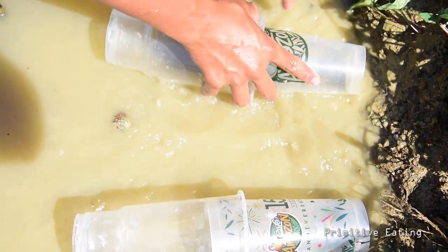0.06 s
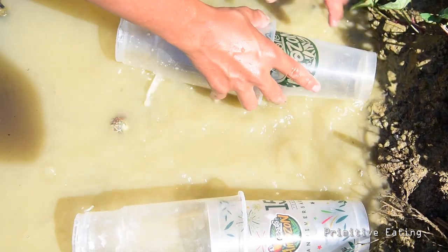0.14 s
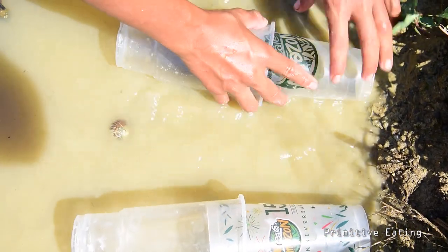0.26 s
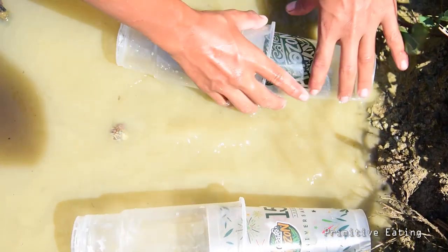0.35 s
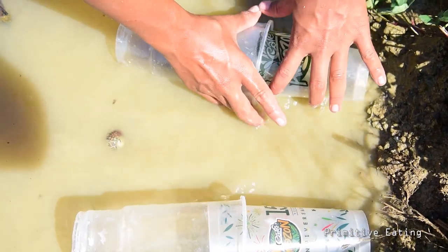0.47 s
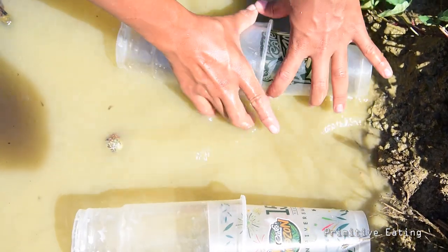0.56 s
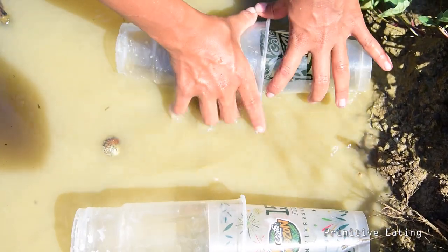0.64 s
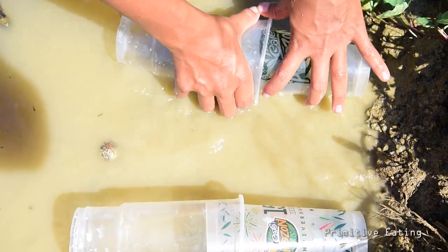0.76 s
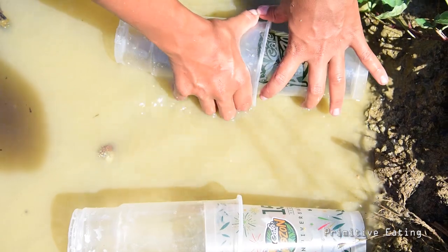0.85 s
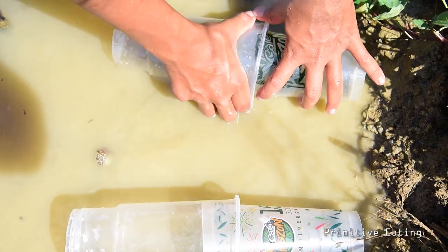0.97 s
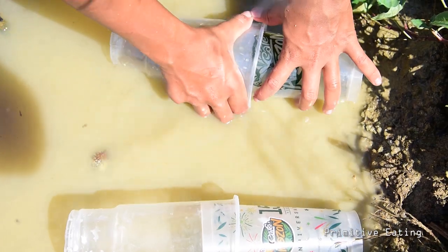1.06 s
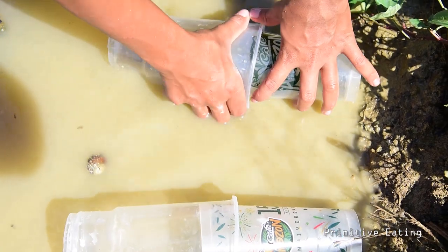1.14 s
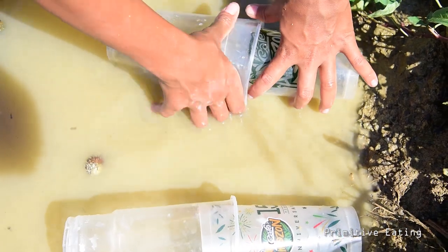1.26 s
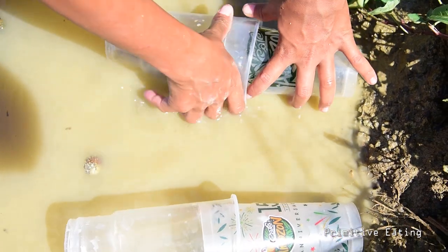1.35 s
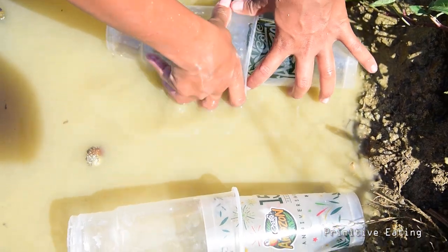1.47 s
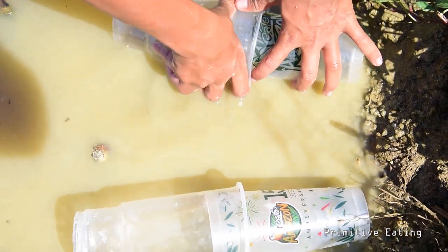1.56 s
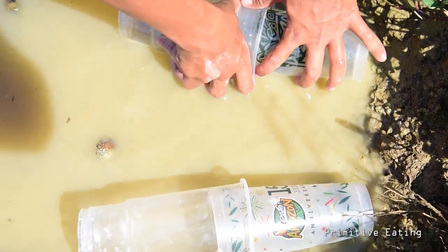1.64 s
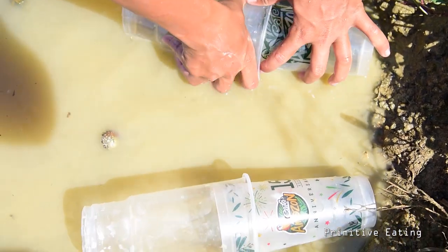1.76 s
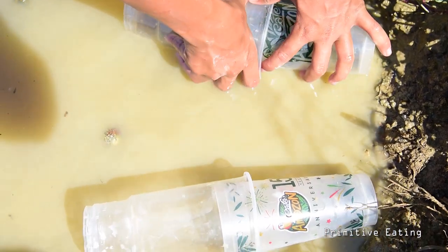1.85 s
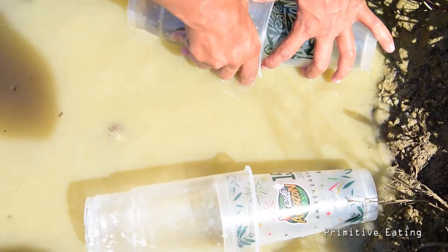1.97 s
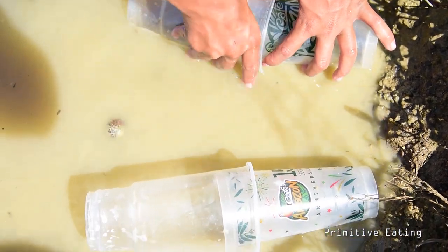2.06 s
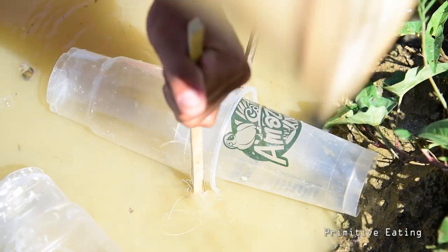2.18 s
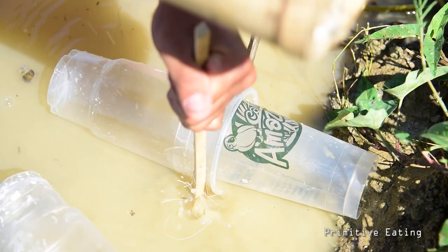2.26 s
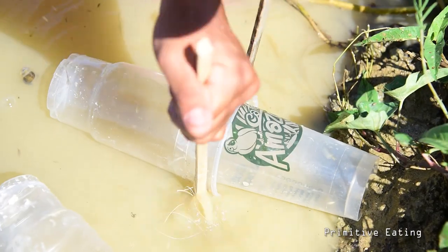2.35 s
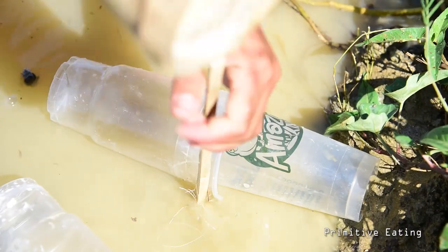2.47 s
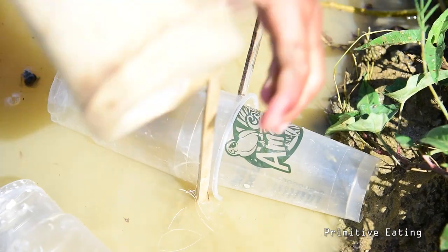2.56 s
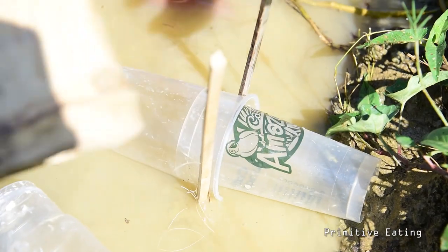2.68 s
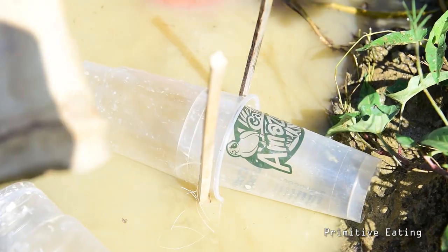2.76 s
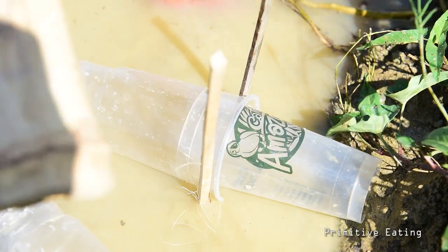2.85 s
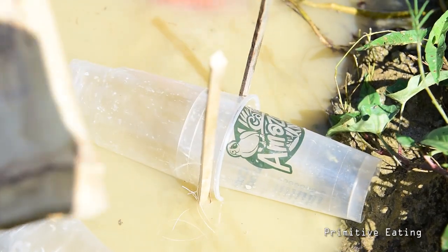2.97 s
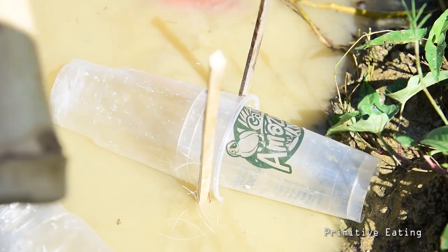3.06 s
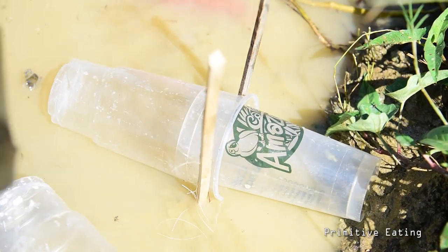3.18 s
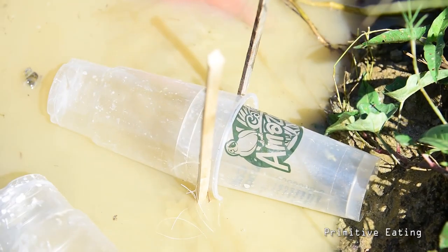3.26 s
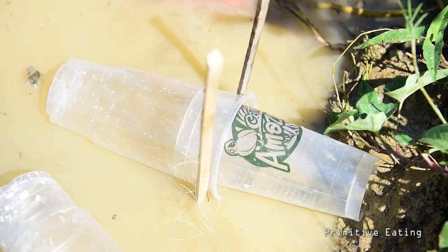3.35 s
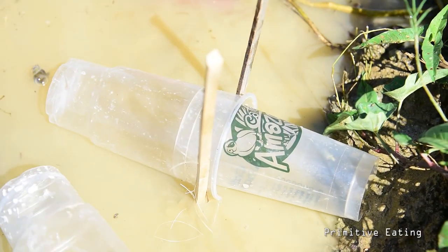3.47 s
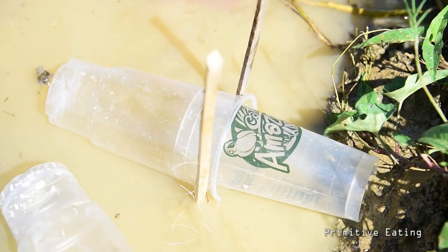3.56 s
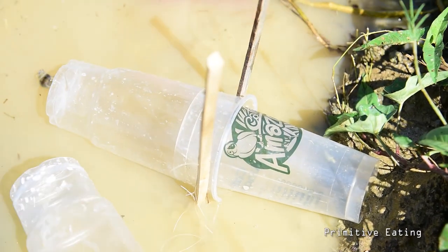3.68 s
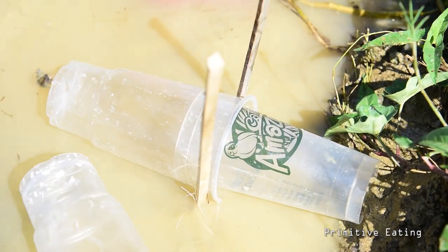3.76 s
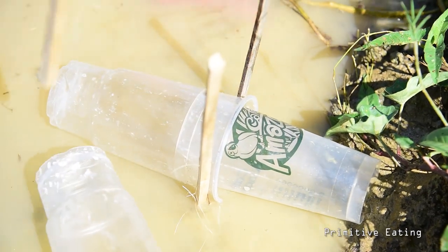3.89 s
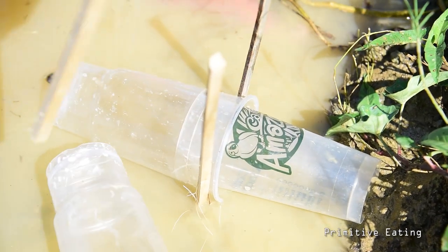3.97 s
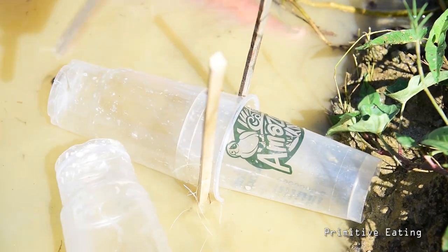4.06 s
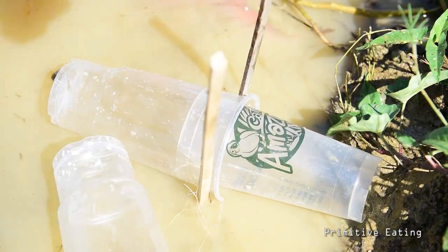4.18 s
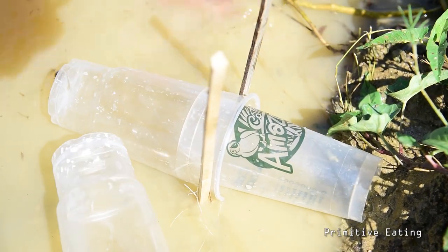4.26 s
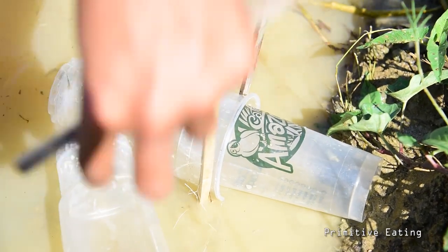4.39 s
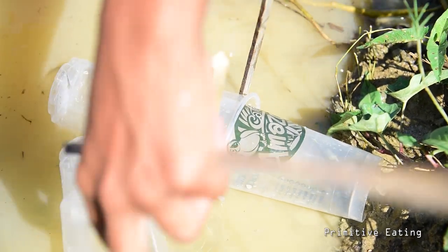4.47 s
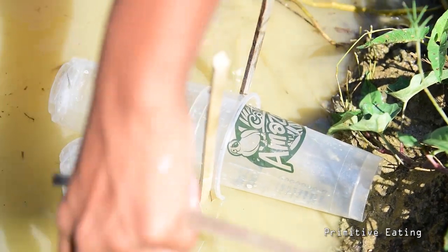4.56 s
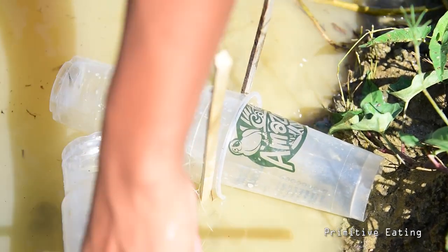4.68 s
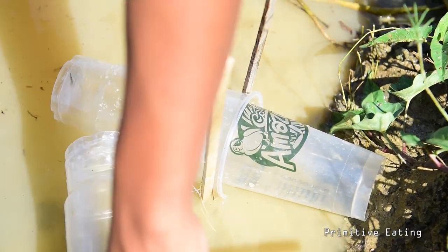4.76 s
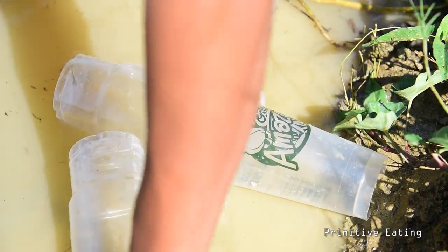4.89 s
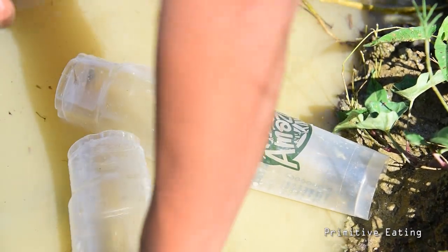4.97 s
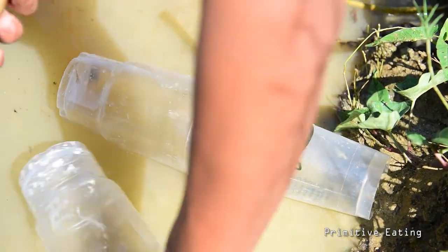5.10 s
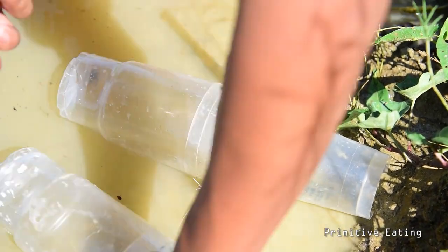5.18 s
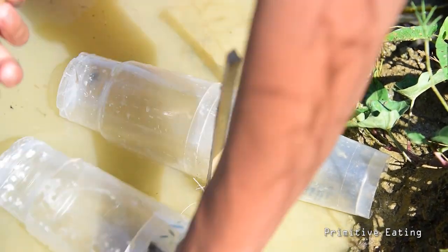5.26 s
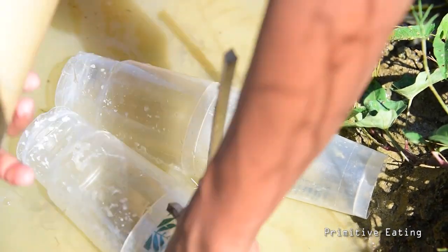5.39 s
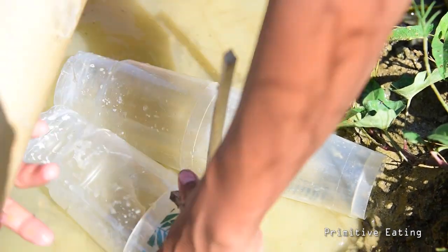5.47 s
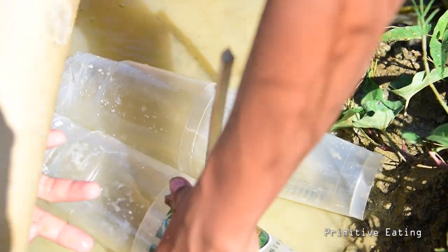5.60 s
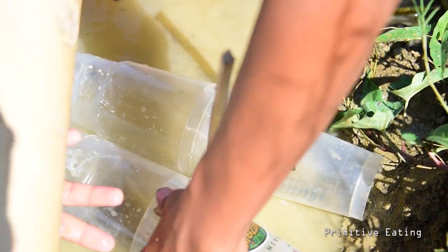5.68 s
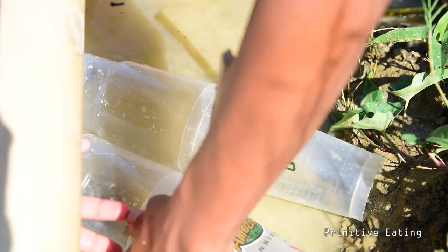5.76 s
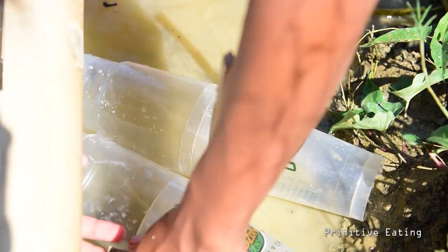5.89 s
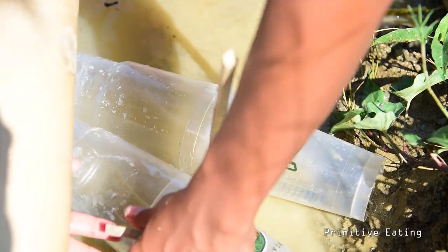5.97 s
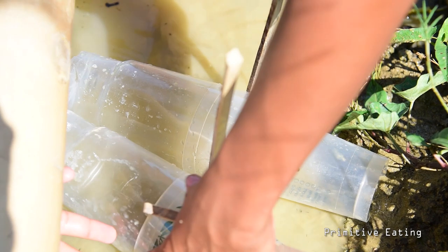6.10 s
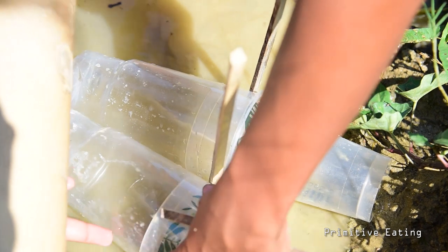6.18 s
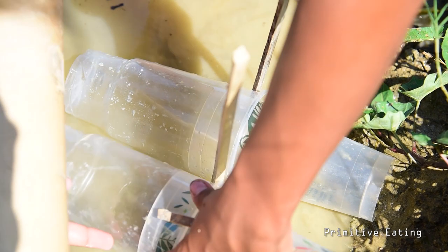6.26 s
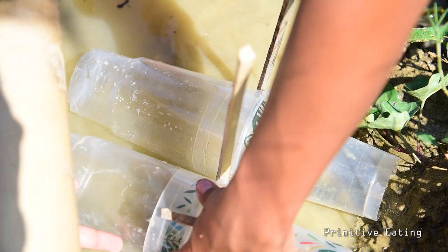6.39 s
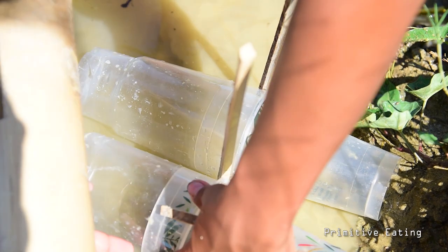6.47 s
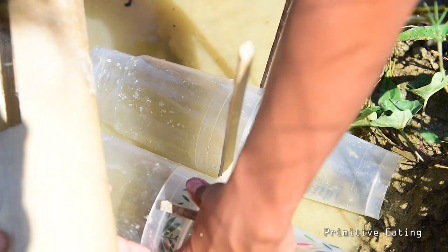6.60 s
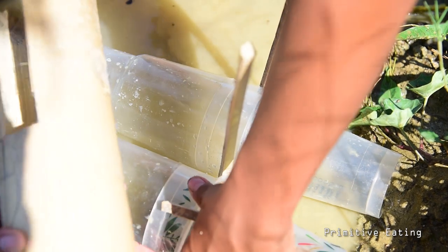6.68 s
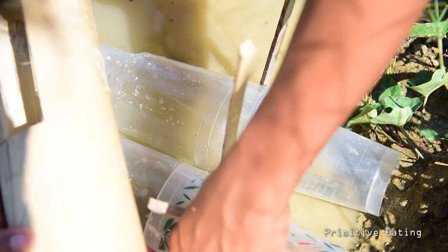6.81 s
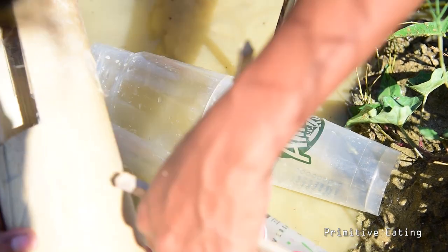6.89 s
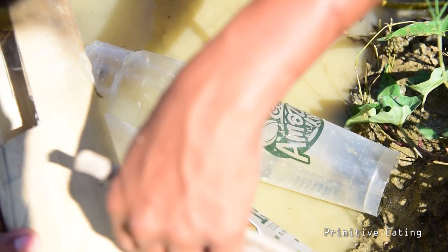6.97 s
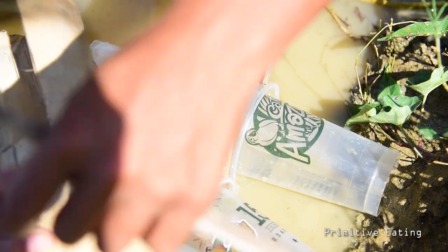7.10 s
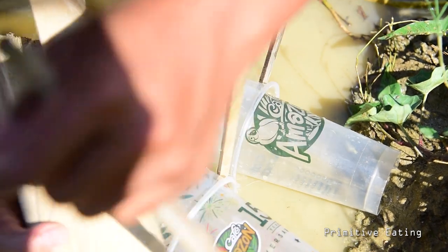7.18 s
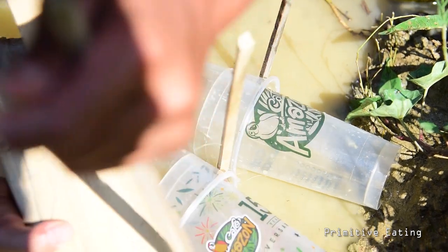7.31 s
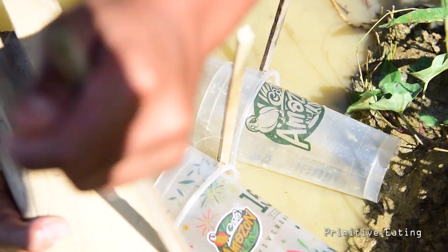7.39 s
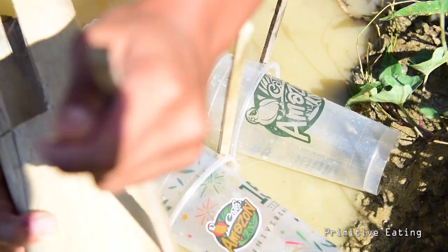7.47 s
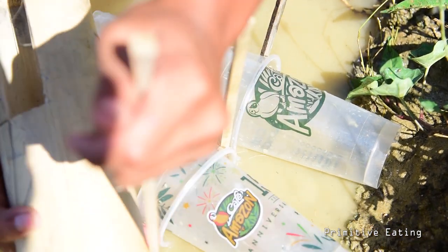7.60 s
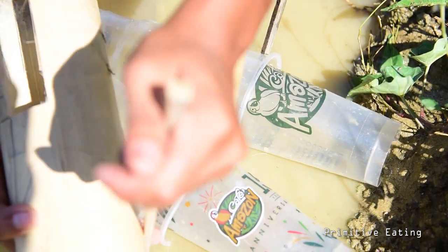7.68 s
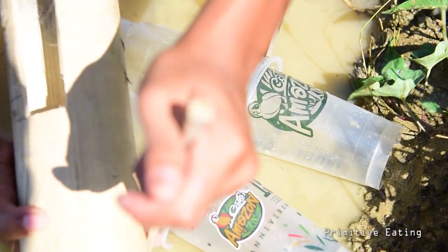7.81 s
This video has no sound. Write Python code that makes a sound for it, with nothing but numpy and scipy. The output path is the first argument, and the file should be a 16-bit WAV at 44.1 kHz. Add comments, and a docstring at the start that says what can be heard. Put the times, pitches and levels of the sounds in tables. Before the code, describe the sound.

Small splashes and crisp plastic snaps, a huge hollow wooden blow, rustling leaves, squeaky cup handling, bird chips and a bamboo tube sliding on a stake.

```python
"""Water swishes and drips first, as hands press thin plastic cups into a shallow muddy puddle: noise and bubbles.
Bamboo stakes pin the cups down. Cup walls rub (showers of tiny ringing contacts) and snap (short noise bursts).
One close mallet blow, a crack over ringing wood and air, overloads the microphone; then leaves rustle as noise.
A bamboo tube knocks and slides on a stake, both through the same ringing notes.
A small bird chips with gliding tones over a soft outdoor rumble of filtered noise."""
import sys
import numpy as np
from scipy import signal
from scipy.fft import rfft, irfft
from scipy.io import wavfile
from scipy.ndimage import uniform_filter1d

SR = 44100
rng = np.random.default_rng(int(sys.argv[2]) if len(sys.argv) > 2 else 0)


def digitize_waveform(pressure):
    """Quantize a signal to 16-bit integers and store it at the path in sys.argv[1].

    Rows of a 2-D input are taken as channels; values are limited to [-1, 1].
    """
    field = np.atleast_2d(pressure).T
    bounded = np.clip(field, -1, 1)
    quanta = np.round(bounded * 32767).astype(np.int16)
    wavfile.write(sys.argv[1], SR, quanta)


N = 345744
TIME = np.arange(N) / SR
AGE = TIME[:SR // 2]   # seconds since a sound began, up to half a second

# low buffeting on the microphone, before a shared lift: (time [s], level [dB])
RUMBLE_LEVEL = [(0.0, -50), (0.44, -56.5), (1.11, -40), (1.42, -52), (2.23, -48.5), (3.54, -61),
                (5.68, -57.5), (6.66, -57.5), (7.84, -48)]
# colour of the buffeting: (frequency [Hz], density [dB per Hz])
RUMBLE_COLOUR = [(22, -11.5), (75, 1), (182, -1), (232, -15.5), (400, -31), (520, -70.5)]
# colour of the open-air hush: (frequency [Hz], density [dB per Hz])
AIR_COLOUR = [(90, -10), (181, -3), (547, -6.5), (1310, -14.5), (3000, -16.5), (6700, -18.5), (8830, -22.5),
              (15700, -23)]
AIR_DB = -52
# bird chips: (time [s], level [dB])
CHIPS = [(2.165, -42.5), (2.893, -44), (3.668, -46), (3.796, -53), (4.052, -47.5), (4.381, -50),
         (4.638, -48), (5.088, -50), (5.249, -46), (5.52, -41), (5.773, -41), (6.122, -46), (6.663, -39.5),
         (6.812, -46), (6.916, -37), (6.985, -44.5), (7.651, -33.5)]
# one chip flicks up, arches and drops, before its length varies: (time [s], pitch [Hz], height [0 to 1])
CHIP_SHAPE = [(0, 5600, 0), (.002, 6950, .8), (.005, 7150, 1), (.01, 7330, .7), (.015, 7520, .3),
              (.02, 7300, .15), (.027, 6200, 0)]
# soft bumps through the ground: (time [s], level [dB], pitch [Hz])
BUMPS = [(1.088, -20.5, 85.8), (2.271, -7.5, 40.4), (6.056, -23.5, 134.1), (6.513, -22.5, 88.6),
         (7.385, -25, 92), (7.73, -25, 97.5)]
# dry leaves brushed on the bank:
# (start [s], length [s], level [dB], brightness [dB per octave], swell from start to end [dB])
RUSTLES = [(3.015, 0.16, -47.5, 0.1, -18), (3.163, 0.209, -40.5, 0.6, 0.5), (3.368, 0.037, -38.5, 2.5, 7)]
# colour of the leaves: (frequency [Hz], density [dB per Hz])
RUSTLE_COLOUR = [(350, -6), (600, -6), (3070, -6), (6500, -1.5), (10000, -12.5), (15500, -21)]
# a dry stem springs free with a ping: (time [s], level [dB])
STEM_TICKS = [(3.4185, -32)]
# notes of the stem: (pitch [Hz], level [dB], time to fall 60 dB [s])
STEM_NOTES = [(5230, 3.5, 0.022), (8460, -3, 0.017)]
# bamboo tube set against a stake: (time [s], level [dB])
TUBE_KNOCKS = [(7.317, -12.5), (7.3188, -20), (7.3412, -23.5)]
# notes of the tube, its air column first: (pitch [Hz], level [dB], time to fall 60 dB [s])
TUBE_NOTES = [(405, -30, 0.095), (790, -17.5, 0.13), (1297, -0.5, 0.041), (1865, -0.5, 0.037),
              (2140, -1, 0.018), (2730, -8, 0.045), (2996, -6, 0.054), (3530, -3, 0.0074), (4780, 1, 0.02),
              (5840, -8, 0.0093)]
# the tube is pushed down the stake: (start [s], length [s], level [dB], swell from start to end [dB])
SLIDES = [(7.367, 0.051, -43, 0), (7.417, 0.17, -42.5, 1), (7.585, 0.066, -50.5, 9), (7.645, 0.1, -42.5, 5)]
# mallet blow on the stake: (time [s], level [dB])
BLOWS = [(2.2616, 0.5)]
# notes of the bamboo mallet: (pitch [Hz], level [dB], time to fall 60 dB [s])
MALLET_NOTES = [(190, -12.5, 0.11), (272, -5, .08), (616.4, -14, 0.09), (827, 9, 0.053), (933, 11, 0.04),
                (1082.5, 2, 0.054), (1234, -3, 0.06), (2683, -8, 0.11), (2740, -8, 0.145),
                (2980, -5, 0.058), (3860, 1.5, 0.032), (5150, 1, 0.028)]
# the air column inside the mallet: (pitch [Hz], level [dB], time to fall 60 dB [s])
MALLET_AIR = [(422.3, 14.5, 0.11), (366.8, 9.5, 0.087)]
# a hand or cup pushes water:
# (start [s], length [s], level [dB], brightness [dB per octave], swell from start to end [dB])
SPLASHES = [(0.028, 0.024, -36.5, 2.5, 0), (0.053, 0.11, -41, 0.8, -4), (0.161, 0.052, -36.5, 0.6, 2),
            (0.287, 0.025, -38, 0.9, 4), (0.369, 0.089, -47, 2.4, 2), (0.478, 0.19, -52, 0, 21),
            (0.682, 0.048, -44, 3.5, -12), (0.759, 0.11, -45.5, 0.5, -18), (1.012, 0.047, -49.5, -3, 3),
            (1.269, 0.041, -52.5, 0.5, -6), (1.418, 0.068, -54, 5, 8), (2.358, 0.028, -47, 0.5, 0)]
# colour of the splashes: (frequency [Hz], density [dB per Hz])
SPLASH_COLOUR = [(140, -6.5), (212, 8), (318, -6), (525, -7.5), (680, -15.5), (1350, -8), (2500, -13),
                 (5840, -15.5), (15000, -39)]
# drops fall back and trap a bubble each: (time [s], bubble level [dB], starting pitch [Hz])
DRIPS = [(.092, -31.5, 3430), (.419, -35, 3030), (.427, -34, 2380), (0.644, -37.5, 2360),
         (5.309, -29, 2770)]
# hollow plops as a cup takes in water; the last, low row is the bamboo tube touching: (time [s], level [dB],
# starting pitch [Hz], time to fall 60 dB [s])
PLOPS = [(0.688, -22, 973, 0.02), (0.702, -26.5, 850, 0.061), (2.523, -33.5, 598, 0.063),
         (4.15, -39.5, 1057, 0.045), (5.04, -13.5, 1180, 0.0032), (6.927, -27, 1053, 0.11),
         (6.928, -31, 467, 0.12)]
# a cup, finger or stake rubs along another:
# (start [s], length [s], level [dB], brightness [dB per octave], swell from start to end [dB])
RUBS = [(4.053, 0.13, -55, 7, 7), (4.42, 0.054, -47.5, 4.5, 2), (5.053, 0.034, -41.5, 7, -4),
        (5.094, 0.12, -47, 2, -5), (5.183, 0.077, -41.5, 1.5, -4), (5.298, 0.089, -41, 4, -10),
        (5.381, 0.018, -35.5, 2, 5), (5.429, 0.13, -39, 2.5, -4), (5.587, 0.057, -33, 2.5, 18),
        (5.659, 0.064, -43.5, -2.5, -15), (5.701, 0.061, -43, 1.5, 6), (5.764, 0.23, -46.5, 0.5, 3),
        (5.996, 0.042, -40.5, 0.5, -7), (6.12, 0.12, -48.5, 1.5, 10), (6.264, 0.12, -44, 3, 4),
        (6.393, 0.048, -40.5, 0.5, -3), (6.627, 0.021, -43.5, -1.5, -2), (6.921, 0.043, -37.5, 3, -1),
        (6.997, 0.24, -52, 2, -26)]
# colour of the rubs: (frequency [Hz], density [dB per Hz])
RUB_COLOUR = [(120, -36), (200, -3), (332, 1), (485, 0), (850, -1.5), (1380, -1.5), (2100, -2.5),
              (3400, -5.5), (5970, -10), (15000, -33.5)]
# one cup rim scrapes out of another:
# (start [s], length [s], level [dB], brightness [dB per octave], swell from start to end [dB])
SCRAPES = [(5.795, 0.03, -41.5, 2, 16), (5.829, 0.033, -34, 3, 5), (5.86, 0.039, -41.5, 1, -2)]
# colour of the scrapes: (frequency [Hz], density [dB per Hz])
SCRAPE_COLOUR = [(1000, -22), (3200, -12), (4400, 5.5), (5800, -2), (7500, -3.5), (15500, -12)]
# resonances of a wet cup wall, which shift with grip and water level: (middle pitch [Hz], width [Hz], level [dB])
WALL = [(1350, 270, 4.5), (3040, 300, -3)]
WALL_WANDER, WALL_WANDER_HZ = 0.05, 7.6   # typical share of the pitch; how fast
# a cup wall snaps or knocks:
# (time [s], peak [dB], ring [Hz], hollow boom before a shared cut [dB])
SNAPS = [(0.0326, -23.5, 1900, -30), (0.044, -19.5, 2160, -35.5), (0.081, -26, 1700, -46),
         (0.1437, -31, 3500, -48), (0.195, -25, 4500, -54), (0.199, -16.5, 3600, -44),
         (0.6882, -23.5, 1370, -45), (0.703, -38, 2000, -48), (0.762, -30.5, 4460, -48),
         (0.951, -31, 3320, -36), (2.628, -31, 4960, -41), (3.018, -23.5, 4580, -48),
         (4.176, -32, 8800, -52), (5.0395, -19.5, 1390, -34.5), (5.069, -25.5, 1570, -32),
         (5.074, -25, 1400, -32.5), (5.13, -22.5, 2100, -46), (5.349, -26, 3230, -51),
         (5.363, -18.5, 2364, -25), (5.418, -20, 2200, -48), (5.45, -28, 2780, -45),
         (5.637, -18.5, 1960, -37.5), (5.828, -18.5, 4900, -46), (5.8965, -16.5, 1860, -35.5),
         (6.073, -27, 5250, -44), (6.2077, -19.5, 4950, -41), (6.303, -19, 1670, -60),
         (6.325, -26, 2550, -46), (6.341, -32, 3220, -59), (6.3655, -22, 1138, -29.5),
         (6.9255, -18.5, 1600, -60), (6.9326, -16, 1190, -52), (7.1794, -30, 7060, -60)]
# air inside a cup, before each snap shifts its pitch: (pitch [Hz], level [dB], time to fall 60 dB [s])
CUP_AIR = [(208, -0.5, 0.18), (344, 3.5, 0.046), (500, 3.5, 0.034)]
# while a cup is moved its wall also crinkles at random; the boom is relative to the crinkle's peak
CRINKLES_PER_S = 26
CRINKLE_OVER_STROKE_DB, CRINKLE_SPREAD_DB, CRINKLE_BOOM_DB = 2.5, 9.5, -12.5
CRINKLE_LOW_HZ, CRINKLE_HIGH_HZ = 1520, 4600
CUTOFF_HZ = 15750


def from_db(db):
    """Turn decibels into a gain."""
    return 10 ** (np.asarray(db) / 20)


def rms_one(x):
    """Scale a sound to unit power."""
    return x / np.sqrt(np.mean(x ** 2) + 1e-20)


def noise(size=len(AGE)):
    """Plain random noise."""
    return rng.standard_normal(size)


def add(out, start, sound):
    """Mix a sound in at a time in seconds."""
    at = max(0, int(start * SR))
    out[at:at + len(sound)] += sound[:max(0, N - at)]


def fade(t60):
    """Die away smoothly, falling 60 dB in t60 seconds."""
    return np.exp(-np.log(1000) * AGE / t60)


def coloured(x, spectrum, tilt_db=0):
    """Shape a noise with a spectrum, tilted by tilt_db per octave; unit power."""
    hz, level_db = np.transpose(spectrum)
    octave = np.log2(np.fft.rfftfreq(len(x), 1 / SR) + 1)   # the 1 avoids the log of zero
    curve_db = np.interp(octave, np.log2(hz), level_db, left=-120, right=-120)
    gain = from_db(curve_db + tilt_db * octave)
    return rms_one(irfft(rfft(x) * gain, len(x)))


def wander(size, rate_hz):
    """Random drift with a spread of one, mostly slower than rate_hz."""
    return coloured(noise(size), [(2, 0), (rate_hz, 0), (3 * rate_hz, -20)])


def resonate(x, hz, width_hz):
    """Pass a sound through one resonance with unit gain at its top."""
    r = np.exp(-np.pi * width_hz / SR)
    feed = np.array([1, 0, -1]) * (1 - r * r) / 2
    feedback = [1, -2 * r * np.cos(2 * np.pi * hz / SR), r * r]
    return signal.lfilter(feed, feedback, x + 1e-18)


def gliding(x, hz, width_hz, size=128):
    """One resonance whose centre follows a curve, in short blocks; unit gain at its top."""
    out, state = np.zeros(len(x)), [0j]
    r = np.exp(-np.pi * width_hz / SR)
    for i in range(0, len(x), size):
        feedback = [1, -r * np.exp(2j * np.pi * hz[i] / SR)]
        block, state = signal.lfilter([2 * (1 - r)], feedback, x[i:i + size], zi=state)
        out[i:i + size] = block.real
    return out


def ringing(notes):
    """Dying notes after one tap; neighbours start in opposite directions."""
    out = np.zeros(len(AGE))
    for k, (hz, db, t60) in enumerate(notes):
        out += (-1) ** k * from_db(db) * fade(t60) * np.sin(2 * np.pi * hz * AGE)
    return out


def grains(size, per_s, spread_db):
    """Random clicks of uneven strength; unit power."""
    strength = from_db(spread_db * np.minimum(rng.exponential(1, size), 3))
    present = rng.random(size) < per_s / SR
    return rms_one(present * strength * rng.choice([-1, 1], size))


def pings(per_s, spread_db, cycles, count=24):
    """Tiny contacts at many pitches, each ringing a few cycles; unit power."""
    out = np.zeros(len(AGE))
    for hz in np.geomspace(250, 14000, count) * np.exp(rng.uniform(-.09, .09, count)):
        # each pitch gets a share of the nominal rate, larger for high pitches
        rate = max(per_s / count * (hz / 2000) ** .5, 20)
        clicks = grains(len(AGE), rate, spread_db)
        out += rng.choice([-1, 1]) * resonate(clicks, hz, hz / cycles)
    return rms_one(out)


def push(length, swell_db, rise_s, fall_s, arch):
    """Loudness of one movement: quick start, arched hold that swells or ebbs, release; unit power over its length."""
    along = np.minimum(AGE / length, 1)
    release = np.exp(-np.maximum(AGE - (length - fall_s), 0) / fall_s)
    shape = np.clip(AGE / rise_s, 0, 1) * release
    shape *= (1 + arch * (np.sin(np.pi * along) - 2 / np.pi)) * from_db(swell_db * along)
    return shape / np.sqrt(np.sum(shape ** 2) / (length * SR))


def strokes(rows, colour, per_s, spread_db, cycles, smooth_db, rise_s, fall_s, arch, uneven_db, wall=()):
    """Showers of tiny ringing contacts over hiss, in uneven spurts, coloured by any cup wall they touch."""
    out = np.zeros(N)
    for start, length, level_db, tilt_db, swell_db in rows:
        contacts = pings(per_s, spread_db, cycles) + from_db(smooth_db) * noise()
        texture = contacts.copy()
        for hz, width_hz, db in wall:
            centre_hz = hz * np.exp(WALL_WANDER * wander(len(AGE), WALL_WANDER_HZ))
            texture += from_db(db) * gliding(contacts, centre_hz, width_hz)
        spurts = from_db(uneven_db * coloured(noise(), [(20, 0), (160, -7)]))
        movement = push(length, swell_db, rise_s, fall_s, arch)
        sound = movement * spurts * coloured(texture, colour, tilt_db)
        add(out, start, from_db(level_db) * sound / np.sqrt(np.sum(sound ** 2) / (length * SR)))
    return out


def bubble(hz, cycles, rise):
    """A trapped bubble rings and rises in pitch."""
    life = cycles / hz   # seconds to fall 60 dB
    age = AGE[:int(2 * life * SR)]
    tone = np.sin(2 * np.pi * hz * age * (1 + rise * age / life))
    return tone * fade(life)[:len(age)]


def bubbles(rows, bubble_db, per_s=170, cycles=32, rise=0.064):
    """Each movement traps small bubbles, which follow its swell but vary in strength."""
    out = np.zeros(N)
    for start, length, level_db, _, swell_db in rows:
        for when, size, strength in rng.random((int(length * per_s) + 1, 3)):
            gain = 2 * strength * from_db(level_db + swell_db * (when - .5) + bubble_db)
            add(out, start + when * length, gain * bubble(430 * 9 ** size, cycles, rise))
    return out


def banks(x, scatter_db=-14, t60=0.12):
    """Ground and plants throw back a short diffuse tail."""
    response = noise() * fade(t60) * (AGE > .003)
    response /= np.sqrt(np.sum(response ** 2))
    return x + from_db(scatter_db) * signal.fftconvolve(x, response)[:N]


def outdoors(rumble_lift_db=2):
    """Low buffeting noise over the even hush of open country."""
    rumble_db = np.interp(TIME, *np.transpose(RUMBLE_LEVEL)) + rumble_lift_db
    rumble = from_db(rumble_db) * coloured(noise(N), RUMBLE_COLOUR)
    return rumble + from_db(AIR_DB) * coloured(noise(N), AIR_COLOUR)


def bird(echo_db=-5, echo_t60=0.16, flutter=.02):
    """Short arched chips with a fast pitch flutter, smeared by the foliage."""
    out = np.zeros(N)
    shape_s, hz, height = np.transpose(CHIP_SHAPE)
    for start, level_db in CHIPS:
        age = AGE * rng.uniform(0.9, 1.2)   # chips vary in length
        pitch = np.interp(age, shape_s, hz) * (1 + flutter * wander(len(AGE), 200))
        tone = np.sin(2 * np.pi * np.cumsum(pitch) / SR)
        chip = np.interp(age, shape_s, height, right=0) * tone
        echo = signal.fftconvolve(chip, noise() * fade(echo_t60))[:len(AGE)]
        add(out, start, from_db(level_db) * (chip + from_db(echo_db) * echo / np.abs(echo).max()))
    return out


def bumps(t60=0.04, onset_s=0.0061):
    """Dull thuds: low notes that start softly and die quickly."""
    out = np.zeros(N)
    for start, level_db, hz in BUMPS:
        thud = np.sin(2 * np.pi * hz * AGE) * fade(t60) * (1 - np.exp(-AGE / onset_s))
        add(out, start, 2 * from_db(level_db) * thud)   # 2 makes up for the soft start
    return out


def leaves():
    """Dry leaves rustle as many tiny contacts mixed with hiss."""
    return strokes(RUSTLES, RUSTLE_COLOUR, per_s=2200, spread_db=3.0, cycles=16, smooth_db=1,
                   rise_s=0.0029, fall_s=0.006, arch=0.061, uneven_db=1.5)


def stem(scratch_t60=0.014):
    """A brief scratch sounds along with the ringing stem."""
    out = np.zeros(N)
    for start, level_db in STEM_TICKS:
        scratch = noise() * fade(scratch_t60)
        rasp = np.std(scratch) * coloured(scratch, RUSTLE_COLOUR)
        add(out, start, from_db(level_db) * (ringing(STEM_NOTES) + rasp))
    return out


def sliding(rise_s=0.0065, fall_s=0.0061, arch=0.64):
    """Pressure of the tube on the stake over all its pushes."""
    out = np.zeros(N)
    for start, length, level_db, swell_db in SLIDES:
        add(out, start, from_db(level_db) * push(length, swell_db, rise_s, fall_s, arch))
    return out


def tube(crack_db=-2, crack_t60=0.027, air_db=-6, wood_db=-2.5, hum_db=-1, judder_db=1.7, shift_db=1.5, hiss_db=-9):
    """Knocks and juddering friction excite the same hollow tube; the rubbing fibres hiss above it."""
    out, body = np.zeros(N), ringing(TUBE_NOTES)
    air_hz, _, air_t60 = TUBE_NOTES[0]
    late = 1 - np.exp(-AGE / 0.0066)   # the air column answers late
    air = np.sin(2 * np.pi * air_hz * AGE) * fade(air_t60) * late
    # (frequency [Hz], density [dB per Hz])
    contact = [(300, -43), (1300, 9.5), (4700, 13.5), (7100, 7.0), (8300, -13), (15000, -45)]
    for start, level_db in TUBE_KNOCKS:
        crack = from_db(crack_db) * fade(crack_t60) * coloured(noise(), contact)
        add(out, start, from_db(level_db) * (.5 * body + crack + from_db(air_db) * air))

    slips = grains(N, per_s=3700, spread_db=2.5)
    hum = rms_one(resonate(resonate(slips, air_hz, 45), air_hz, 45))
    # the point of contact shifts, so each note swells and ebbs on its own
    wood = np.zeros(N)
    for note in TUBE_NOTES:
        wood += signal.fftconvolve(slips, ringing([note]))[:N] * from_db(shift_db * wander(N, 15.0))
    # the stake slowly stops up the tube: the hum drops 16 dB per second
    choke = from_db(-16 * np.maximum(TIME - TUBE_KNOCKS[0][0], 0))
    # the dense upper notes of the wall
    fibres = signal.fftconvolve(slips, noise() * fade(0.11))[:N]
    friction = coloured(fibres, contact) + from_db(wood_db) * rms_one(wood)
    friction += from_db(hum_db) * choke * hum + from_db(hiss_db) * slips
    judder = from_db(judder_db * wander(N, 24.5))
    return out + rms_one(friction) * sliding() * judder


def mallet(crack_db=7, crack_t60=0.048, scatter_db=-22, scatter_t60=0.08, tail_db=-37, tail_t60=0.8):
    """A hard crack and ringing wood; the hollow note builds up behind; near and far plants scatter a tail."""
    out = np.zeros(N)
    build_up = 1 - np.exp(-(AGE / .012) ** 2)
    # (frequency [Hz], density [dB per Hz])
    crack_colour = [(30, -13.5), (250, -8.0), (900, 11.5), (1800, -5.5), (4000, -1), (6300, -1.5),
                    (8500, -18.0), (16000, -26.5)]
    scatter_colour = [(200, -0.5), (6300, -5), (9000, -20.0), (16000, -24.0)]
    for start, level_db in BLOWS:
        crack = from_db(crack_db) * fade(crack_t60) * coloured(noise(), crack_colour)
        near_and_far = from_db(scatter_db) * fade(scatter_t60) + from_db(tail_db) * fade(tail_t60)
        unsteady = from_db(2 * wander(len(AGE), 30))
        tail = coloured(noise(), scatter_colour) * unsteady * near_and_far
        wood = ringing(MALLET_NOTES) + crack
        add(out, start, from_db(level_db) * (wood + build_up * ringing(MALLET_AIR) + tail))
    return out


def lapping(level_db=-62, swing_db=4.5):
    """The stirred puddle keeps lapping faintly at cups and bank."""
    level = from_db(level_db + swing_db * wander(N, 3.5))
    return level * coloured(grains(N, per_s=2500, spread_db=3), SPLASH_COLOUR)


def drips(cycles=110, rise=0.017, tick_db=-7, tick_t60=0.0081):
    """A drop ticks on the surface and its bubble rings."""
    out = np.zeros(N)
    for start, level_db, hz in DRIPS:
        tick = fade(tick_t60) * rms_one(resonate(noise(), hz, hz))
        add(out, start, from_db(level_db + tick_db) * tick)
        add(out, start, from_db(level_db) * bubble(hz, cycles, rise))
    return out


def plops(sag=0.26, sag_s=0.0244):
    """A pocket of air rings, and its note sags as the pocket widens."""
    out = np.zeros(N)
    for start, level_db, hz, t60 in PLOPS:
        pitch = hz * (1 - sag * (1 - np.exp(-AGE / sag_s)))
        add(out, start, from_db(level_db) * fade(t60) * np.sin(2 * np.pi * np.cumsum(pitch) / SR))
    return out


def water():
    """Spray patters over the bubbles of each splash."""
    spray = strokes(SPLASHES, SPLASH_COLOUR, per_s=2100, spread_db=3.5, cycles=22, smooth_db=-5.0,
                    rise_s=0.002, fall_s=0.0071, arch=0.22, uneven_db=1.0, wall=WALL[1:])
    return spray + bubbles(SPLASHES, bubble_db=-1.5)


def rubs():
    """Rubbing contacts colour themselves with the wet cup wall and stir up small bubbles."""
    rubbing = strokes(RUBS, RUB_COLOUR, per_s=2000, spread_db=3.0, cycles=15.8, smooth_db=-4.5,
                      rise_s=0.0048, fall_s=0.011, arch=0.12, uneven_db=2.1, wall=WALL)
    return rubbing + bubbles(RUBS, bubble_db=-10)


def scrapes():
    """One rim catches on another in sparse, uneven contacts over hiss."""
    return strokes(SCRAPES, SCRAPE_COLOUR, per_s=1200, spread_db=6.0, cycles=9.1, smooth_db=2,
                   rise_s=0.004, fall_s=0.005, arch=0.33, uneven_db=1.5)


def crinkles():
    """Rows of small snaps scattered over splashes and rubs, following each swell with random strength."""
    rows = []
    for start, length, level_db, _, swell_db in SPLASHES + RUBS:
        for along, size, strength in rng.random((int(length * CRINKLES_PER_S), 3)):
            stroke_db = level_db + swell_db * (along - .5)
            peak_db = stroke_db + CRINKLE_OVER_STROKE_DB + CRINKLE_SPREAD_DB * (2 * strength - 1)
            hz = CRINKLE_LOW_HZ * (CRINKLE_HIGH_HZ / CRINKLE_LOW_HZ) ** size
            rows.append((start + along * length, peak_db, hz, peak_db + CRINKLE_BOOM_DB))
    return rows


def snaps(grip_s=0.0008, buckle_t60=0.017, top=2.54, width=0.68, crack_db=-16, flutter_db=-24, flutter_t60=0.037,
          boom_db=-5):
    """A thin wall buckles in a few milliseconds, rings briefly and stirs the air in the cup."""
    out = np.zeros(N)
    for start, peak_db, hz, hollow_db in SNAPS + crinkles():
        force = noise() * (fade(buckle_t60) + from_db(flutter_db) * fade(flutter_t60))
        force *= 1 - np.exp(-AGE / grip_s)
        wall = resonate(force, hz, width * hz) + from_db(crack_db) * resonate(force, 2000, 9300)
        band = signal.butter(2, [hz / 4, min(top * hz, 8500)], "band", fs=SR, output="sos")
        wall = signal.sosfilt(band, wall)
        add(out, start, from_db(peak_db) * wall / np.abs(wall).max())
        squeeze = rng.uniform(0.784, 1.143)   # the cavity changes with grip and water level
        cavity = [(air_hz * squeeze, db, t60) for air_hz, db, t60 in CUP_AIR]
        add(out, start, from_db(hollow_db + boom_db) * ringing(cavity))
    return out


def scene():
    """All sources reach both channels alike; only a faint hiss differs between them."""
    near_bank = leaves() + stem() + drips() + plops() + water() + rubs() + scrapes() + snaps()
    centre = outdoors() + bird() + bumps() + tube() + mallet() + lapping() + banks(near_bank)
    hiss = from_db(-62.5) * coloured(noise(N), [(50, 2.5), (5000, -6), (16000, -2.5)])
    return centre + hiss * np.array([[1], [-1]])   # opposite sign left and right


def record(dry):
    """A fast limiter pulls loud sound down; what is left saturates, a little lopsided. The top of the band is cut."""
    loudness = np.sqrt(np.abs(uniform_filter1d(dry ** 2, SR // 250)))   # over 4 ms
    limited = dry / np.maximum(loudness / 1.05, 1)
    clipped = limited / (1 + np.abs(limited / .98) ** 4) ** (1 / 4)
    lopsided = clipped - .05 * clipped ** 2
    return signal.sosfilt(signal.ellip(12, .1, 90, CUTOFF_HZ, fs=SR, output="sos"), lopsided)


dry = scene()
out = record(dry)
digitize_waveform(out)
```